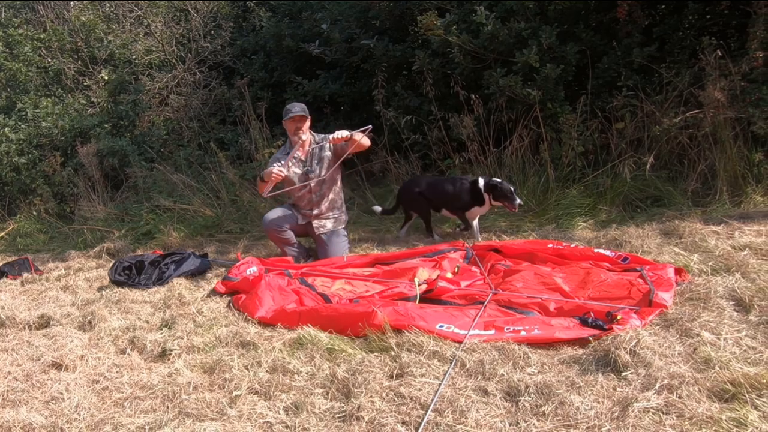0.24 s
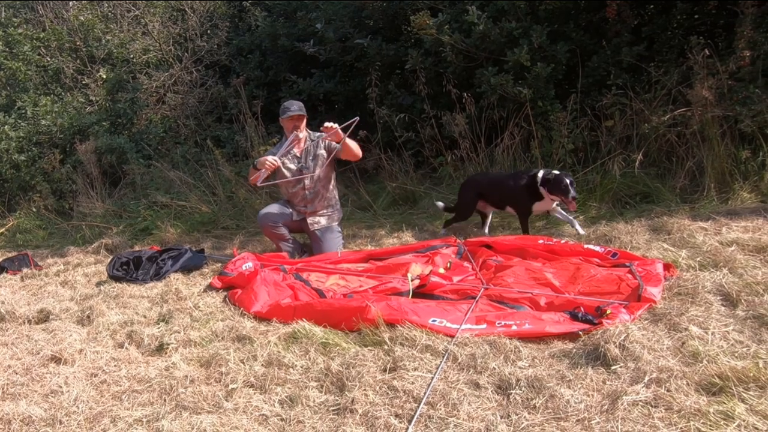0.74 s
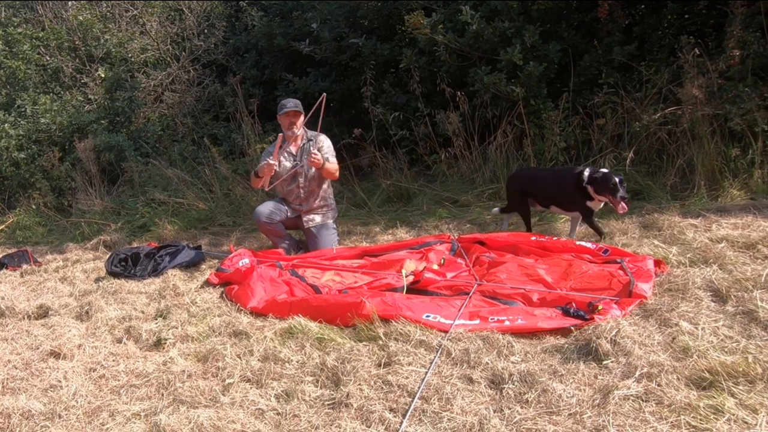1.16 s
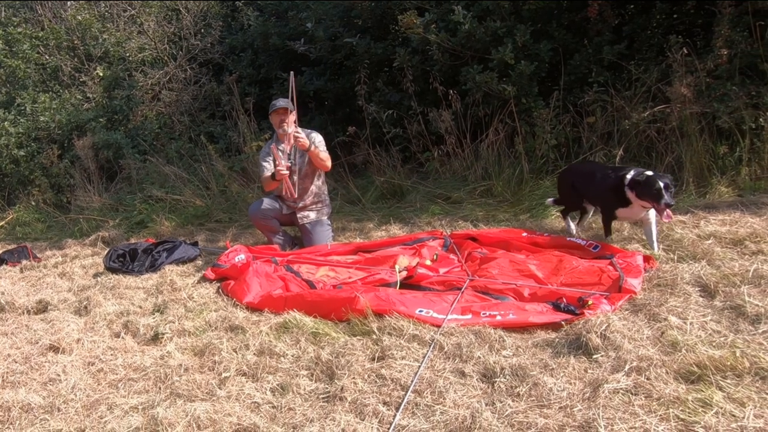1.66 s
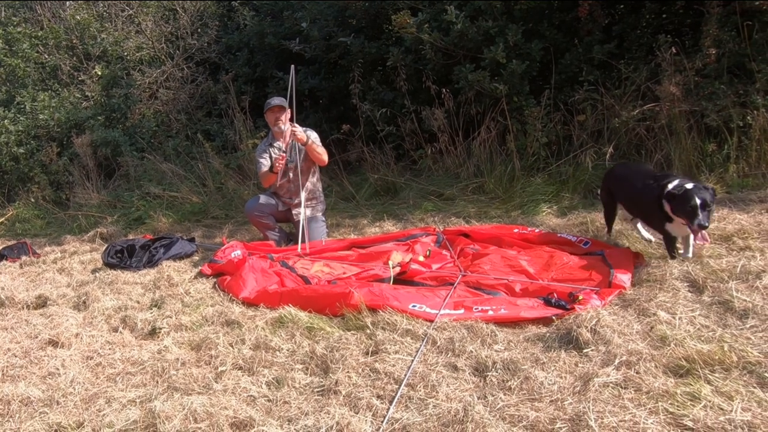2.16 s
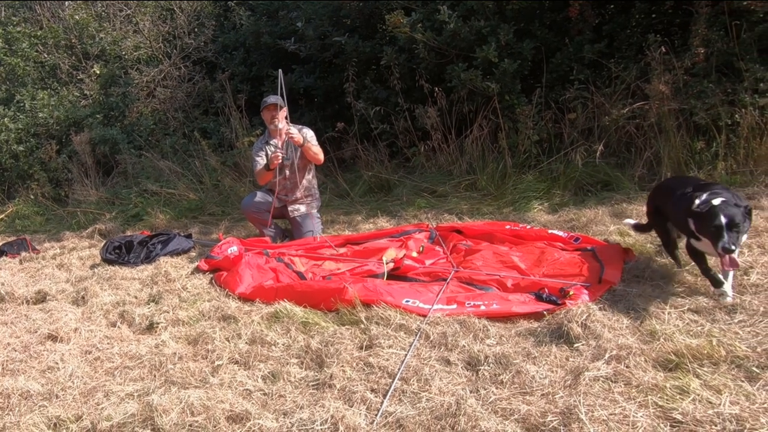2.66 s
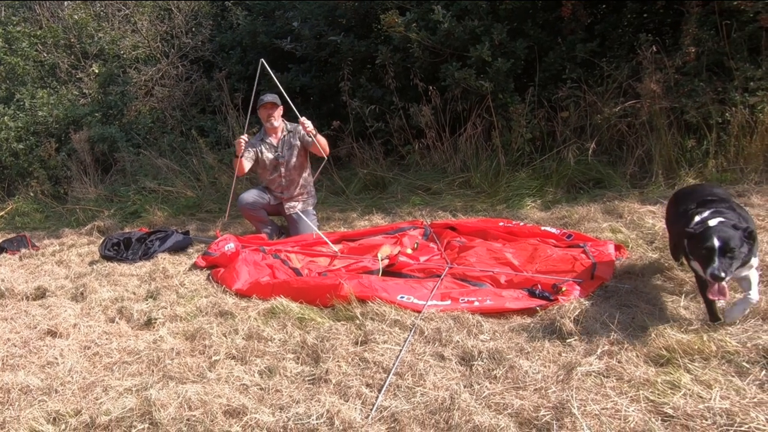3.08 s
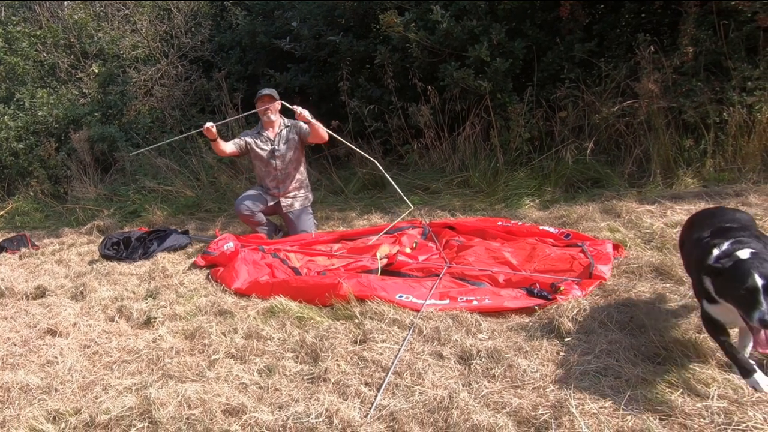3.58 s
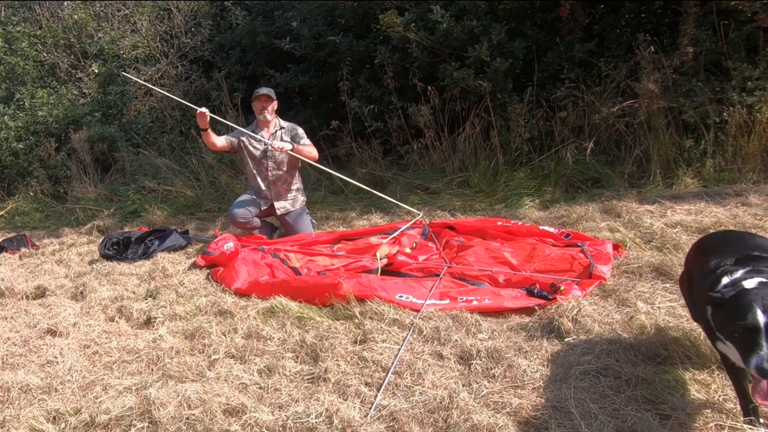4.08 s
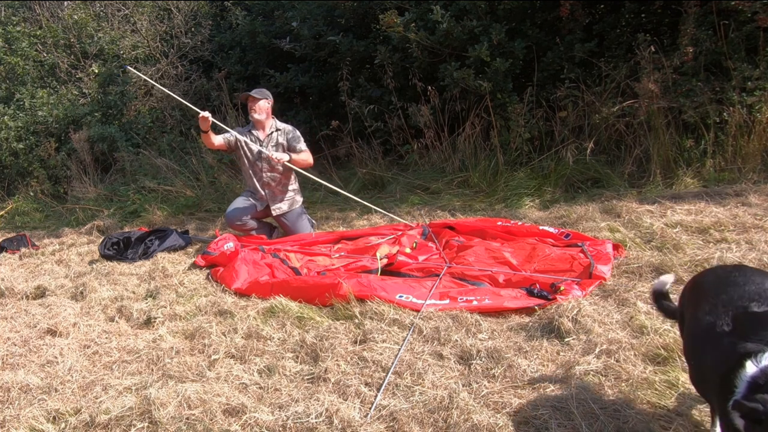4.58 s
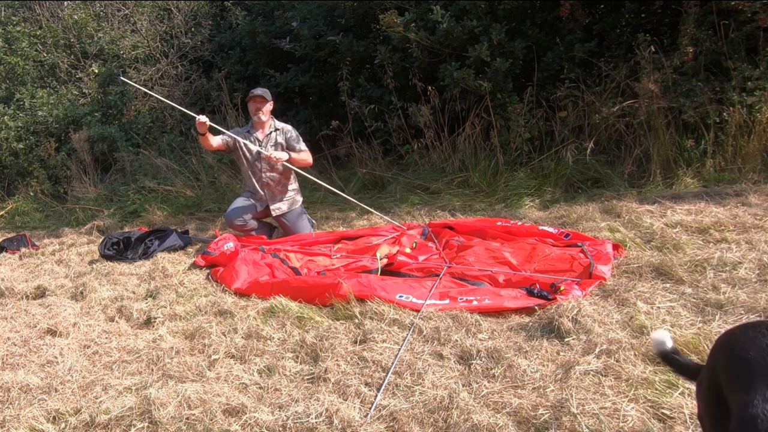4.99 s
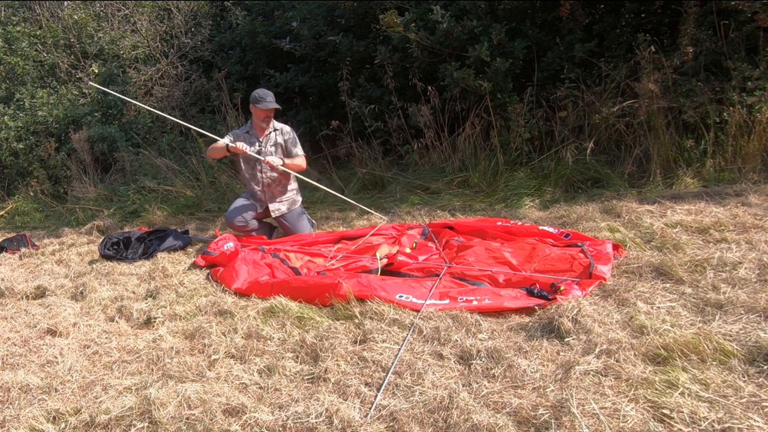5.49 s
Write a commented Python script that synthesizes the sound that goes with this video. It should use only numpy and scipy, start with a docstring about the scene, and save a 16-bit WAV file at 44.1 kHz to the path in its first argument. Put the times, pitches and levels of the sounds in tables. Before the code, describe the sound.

Light metal tubes click, clatter and scrape as a tent pole is unfolded and locked together, close and dry, in a quiet field.

```python
"""An aluminium tent pole clacks, rattles and snaps into its joints as a kneeling man unfolds it in a field.
The elastic cord pulls the sections together: each contact is a burst of many short-lived tones.
Bumps in the grip are hollow knocks; tubes sliding along each other are noise in narrow singing bands.
Some snaps jolt the close microphone. A hedge scatters the pole's sound faintly.
Behind it, shaped noise makes a distant outdoor murmur and a low drone."""
import sys
import numpy as np
from scipy import signal
from scipy.fft import rfft, irfft
from scipy.io import wavfile
from scipy.ndimage import uniform_filter1d

SR = 44100
rng = np.random.default_rng(int(sys.argv[2]) if len(sys.argv) > 2 else 0)


def wrap_up_sound(samples):
    """Save the sound to the file named by the first command line argument, as 16-bit audio."""
    columns = np.atleast_2d(samples).T
    # keep every value between -1 and 1, then stretch to whole-number steps
    tamed = np.clip(columns, -1, 1)
    steps = np.round(tamed * 32767).astype(np.int16)
    wavfile.write(sys.argv[1], SR, steps)


N = 252693

# Tube meets tube: t/s, relative level of the ring/dB, clack against ring/dB, bright edge against ring/dB,
# clack note f/Hz, ring note f/Hz
CONTACTS = [(0.146, -50, 5.5, -11, 3110, 5740), (0.2686, -13.5, -3, -7, 3900, 7400),
            (0.3859, -48, 2.5, -22, 2800, 7140), (0.4274, -16.5, -1.5, -14.5, 3410, 7740),
            (0.6073, -37, -0.5, -14.5, 3320, 6200), (0.6477, -11.5, 0, -5, 3450, 8300),
            (0.723, -40.5, -7, -23, 4410, 6550), (0.7475, -51.5, -5, -21, 4350, 6230),
            (1.1132, -50, 0, -12, 2970, 7810), (1.197, -39.5, -7, -4, 2840, 6250),
            (1.268, -30, -4, -15, 2510, 6700), (1.4249, -23.5, -5.5, -21, 2500, 6820),
            (1.4623, -25.5, -17, -23, 4570, 7040), (1.9134, -26, -2, -14, 4470, 6580),
            (1.9363, -15.5, -10.5, -17, 4490, 6440), (1.946, -21, -4, -24, 4500, 7400),
            (1.9574, -21, -6, -18, 4490, 7700), (2.1443, -45, 1, -16, 4170, 6850),
            (2.2448, -13.5, -3.5, -2.5, 4530, 7370), (2.264, -32.5, 10.5, -2.5, 2750, 6740),
            (2.2905, -27.5, -0.5, -3, 2980, 9000), (2.2956, -20, 1, -7, 2970, 9130),
            (2.3576, -15, 2, -11, 2950, 6490), (2.4743, -12.5, -3, -12, 3210, 6780),
            (2.4856, -24, 1.5, -12, 2260, 5800), (2.5292, -37.5, 5, -17, 2910, 6700),
            (2.6438, -15.5, -2, -10, 4730, 7740), (2.6954, -11.5, -2, -6, 4340, 8400),
            (2.725, -31.5, -2, -8, 2450, 6290), (2.7586, -35, 5.5, -4, 2840, 9700),
            (2.7825, -13.5, -7.5, -10.5, 2280, 8700), (2.7963, -33, 3.5, -1, 3840, 5280),
            (2.8057, -21.5, -4.5, -8.5, 3590, 5200), (2.8254, -27.5, 1.5, -11, 2510, 5140),
            (2.8605, -42, 1.5, -13, 2140, 6850), (3.0433, -13.5, -2, -7, 4690, 6360),
            (3.0495, -16, -15.5, 1.5, 4460, 8350), (3.4336, -49, -6, -10, 1600, 8100),
            (3.7335, -39, 3, -5.5, 2900, 5030), (3.998, -41.5, 3, -7, 3960, 5100),
            (4.074, -13.5, -2.5, -8.5, 1640, 5190), (4.0762, -21, 6, -7.5, 2170, 6100),
            (4.224, -39, 3.5, -14, 2010, 6580), (4.2561, -22, -3.5, -12, 4650, 8160),
            (4.7597, -27, 4.5, -15, 4330, 7720), (5.1133, -32, 2, -10, 2720, 8360)]
# Groups of tones in one section, from hollow body to bright edge: centre f/Hz, spread/octaves, level/dB,
# decay time as a multiple of the ring's, build-up/s
TONE_FAMILIES = [(488, 1.096, -3, 1.77, 0.0011), (1517, .45, -5.5, 1.2, 0.0003),
                 (3155, 0.56, -2.5, 0.97, 0.00031), (7256, 0.46, 0, 0.69, 0.00047),
                 (11860, 0.36, 0.5, 0.66, 0.00032)]
# Resonances of the tubes: f/Hz, width before damping/Hz, level/dB
TUBE_RESONANCES = [(2910, 150, -12), (3200, 57, -15), (4226, 510, -5.5), (4680, 400, -3.5), (5150, 680, -1),
                   (6200, 99, -1), (6920, 150, -8), (7740, 290, 0), (8480, 170, -0.5), (9260, 351.5, -4),
                   (9970, 260, -8.5), (10600, 140, -4)]
# Dull knocks of the bundle in the hands: t/s, level of the hollow part/dB, centre f/Hz
KNOCKS = [(2.217, -23.5, 547), (2.237, -24, 515), (2.246, -19, 420.4), (2.273, -36, 530),
          (2.292, -30.5, 532), (2.341, -27.5, 487), (2.359, -22, 530), (2.487, -32.5, 484),
          (2.535, -28.5, 485), (2.65, -31.5, 528), (2.71, -30, 480), (2.727, -35, 490), (2.787, -31.5, 526),
          (2.81, -34, 487), (3.044, -28.5, 421), (3.667, -33, 616), (3.739, -40.5, 603),
          (3.909, -47.5, 422), (4.084, -30.5, 761)]
# Tube slides along tube: t at full pressure/s, relative treble level/dB, shaft noise against that/dB,
# rise/s, hold/s, release/s
SLIDES = [(.416, -36.5, -6, 0.012, 0.00535, .025), (0.608, -41, -3.5, 0.01, 0.0034, 0.017),
          (0.676, -47.5, 2, .02, .006, .035), (1.209, -43, -0.5, 0.043, 0.0048, 0.029),
          (1.24, -49.5, 3.5, 0.022, .02, 0.048), (1.463, -33.5, -1.5, 0.043, .025, 0.085),
          (1.623, -23, -9.5, 0.038, 0.093, .036), (1.789, -48, 2, 0.024, 0.046, 0.032),
          (1.872, -49, -4, 0.013, 0.0032, 0.079), (1.92, -29.5, -3.5, 0.0097, 0.048, .033),
          (2.235, -40, 8.5, .012, .04, 0.058), (2.35, -55.5, 23, 0.082, .015, 0.033),
          (2.419, -51.5, 6.5, 0.029, 0.0019, 0.03), (2.532, -44.5, 9.5, 0.062, .005, 0.042),
          (2.597, -46, 3.5, .02, 0.0026, 0.03), (2.699, -32, 7.5, 0.0088, 0.00513, 0.048),
          (2.804, -39.5, 4, 0.015, 0.025, 0.037), (2.919, -55.5, 7.5, 0.2, 0.0025, 0.064),
          (3.58, -57, 8.5, 0.13, .04, .05), (3.665, -43.5, 7.5, 0.082, .003, 0.056),
          (3.737, -49.5, 10, .03, 0.0045, .11), (3.99, -52, 8.5, 0.062, .04, 0.11),
          (4.883, -66, 13.5, .1, .005, .09), (5.015, -46.5, 3, 0.026, 0.023, .03)]
# Colour of the plain rubbing noise: f/Hz, relative level/dB
RUB_COLOUR = [(1000, -24), (2500, -5.5), (4000, -12.5), (5200, -4.5), (6400, 10), (7700, 8), (9500, -9),
              (11000, -12), (12500, -14), (16000, -20)]
# Colour of the hollow shaft noise: f/Hz, relative level/dB
SHAFT_COLOUR = [(30, 5), (70, 9.5), (130, 5), (300, -7), (600, -2), (1100, 2), (1800, -11), (2800, -7.5),
                (4500, -14.5), (9000, -51.5)]
# Snaps that jolt the microphone: t/s, level of the push/dB, length of the push/s
JOLTS = [(0.2693, -29, 0.0045), (0.648, -20, 0.0073), (3.0433, -10, .0125), (4.076, -25.5, 0.0074)]
# Colour of the early reflections from ground and body: f/Hz, relative level/dB
NEAR_COLOUR = [(100, 1.5), (900, 5.5), (3000, -12), (8000, -14.5), (15000, -8.5)]
# Colour of the hedge's dull tail: f/Hz, relative level/dB
HEDGE_COLOUR = [(100, 20), (900, 2.5), (3000, -18), (8000, -26), (15000, -19)]
# Colour of the outdoor murmur: f/Hz, relative level/dB
MURMUR_COLOUR = [(20, -3), (45, -4), (70, -1), (100, -8.5), (130, -3.5), (180, -10), (300, -14),
                 (550, -13.5), (800, -6), (1050, -8), (1600, -18), (2900, -28), (6000, -31), (12000, -34.5),
                 (16000, -38)]
# Middle level of the murmur, which then wavers: t/s, level/dB
MURMUR_LEVEL = [(0, -52.5), (1.3, -49), (3.15, -50.5), (3.9, -49), (5.7, -49)]
# Low drone in the distance: f/Hz, width of each of two filter passes/Hz, level before wavering/dB
DRONE = [(64.6, 7.9, -54.5), (136.4, 7.8, -59)]
# How much the channels differ in the pole's sound: f/Hz, relative level/dB
PHASE_SHIFT_COLOUR = [(50, -5), (500, -6.5), (3000, -8.5), (8000, 1.5), (14000, 7)]
# Colour of the faint noise that differs between the channels: f/Hz, relative level/dB
WIDE_NOISE_COLOUR = [(30, -1), (130, -4), (500, -9), (1000, -21.5), (2500, -14.5), (7000, -13.5),
                     (15500, -17)]

WIDE_NOISE_DB = -71
TOP_HZ = 15900
TIME = np.arange(N) / SR
AGE = TIME[:int(.2 * SR)]  # seconds since a short sound began

# Time for the ring to fall 60 dB after a usual blow; each dB of extra force lengthens it very slightly
RING_T60_S, USUAL_BLOW_DB, RING_GROWTH_PER_DB = 0.026, -22, 0.0008
# The hollow body follows the clack's level; soft touches sound hollower than hard snaps
BODY_DB, BODY_FOLLOW, BODY_PER_DB = -9.5, .85, 0.2965
KNOCK_T60_S = .06
# Pressure drop over one rise or release time, and slow sag while the pressure is held
STROKE_RANGE_DB, SAG_DB_PER_S = 31, 55
STROKE_ROUNDING = 1.35  # above 1 a stroke lingers near its full pressure
SHAFT_FOLLOW = 0.71  # shaft noise follows the pressure less steeply than the treble
# The shiver after each clack: level against the clack, shaft noise against that, decay time
SHIVER_DB, SHIVER_SHAFT_DB, SHIVER_T60_S = -22.5, 4.5, .11


def undb(db):
    """Turn decibels into a multiplier."""
    return 10 ** (np.asarray(db) / 20)


def unit(x):
    """Scale a sound to an rms (average strength) of 1."""
    return x / np.sqrt(np.mean(x ** 2))


def add(track, s, sound):
    """Mix a sound into the track at time s."""
    i = int(s * SR)
    track[i:i + len(sound)] += sound[:N - i]


def colour(x, points):
    """Make each pitch range louder or softer, following (f/Hz, level/dB) points."""
    hz, db = np.transpose(points)
    bins = np.maximum(np.fft.rfftfreq(len(x), 1 / SR), 1)
    gain = undb(np.interp(np.log(bins), np.log(hz), db))
    return irfft(rfft(x) * gain, len(x))


def resonate(x, hz, width_hz):
    """Let one resonance answer the sound, with gain 1 at its centre."""
    return signal.lfilter(*signal.iirpeak(hz, hz / width_hz, SR), x)


def fade(t60):
    """Die away evenly in dB, by 60 dB in t60 seconds."""
    return np.exp(-np.log(1000) * AGE / t60)


def walk(rate):
    """Wander at random between new values, rate of them per second."""
    knots = rng.standard_normal(size=4096)
    return np.interp(TIME * rate, np.arange(len(knots)), knots)


def modes(centre_hz, octaves, t60, rise_s, count=64):
    """A struck body vibrates in many fading tones at once; each blow stirs them differently."""
    place, phase = rng.random((2, count, 1))
    # one tone at a random place in each of count equal steps, from -2 to 2 spreads
    offset = 4 * (np.arange(count)[:, None] + place) / count - 2
    hz = centre_hz * 2 ** (octaves * offset)
    # strongest at the centre; nothing above the highest pitch the file can hold
    size = np.exp(-offset ** 2 / 2) * np.cos(np.pi * offset / 4) ** .5 * (hz < SR / 2)
    ringing = AGE[AGE < .01 + 1.2 * t60]
    waves = np.sin((2 * np.pi * (hz * ringing + phase)).astype(np.float32))
    ring = (size * waves).sum(0)
    ring = np.pad(ring, (0, len(AGE) - len(ring)))
    ring = ring * fade(t60) * (1 - np.exp(-AGE / rise_s))
    head = ring[:int(.007 * SR)]
    return ring / np.sqrt(np.mean(head ** 2))  # rms 1 over the first 7 ms


def tube(x, damping=0.95):
    """The tubes' resonances answer a push; less damping narrows them."""
    return sum(undb(db) * resonate(x, hz, width * damping) for hz, width, db in TUBE_RESONANCES)


def clacks(tube_db=-7, direct_db=-3, note_db=-7, note_hold=1.1, thud_db=-17, thud_hz=100,
           thud_t60=0.08, chatter_db=-18, chatter_s=0.005):
    """Contacts stir families of tones and two clear notes, repeat once softly, and thud in the hands."""
    metal, hands = np.zeros(N), np.zeros(N)
    for s, db, clack_db, edge_db, clack_hz, ring_hz in CONTACTS:
        force_db = db - USUAL_BLOW_DB
        t60 = RING_T60_S * np.exp(RING_GROWTH_PER_DB * force_db)
        body_db = BODY_DB + BODY_FOLLOW * clack_db - BODY_PER_DB * force_db
        shares_db = (body_db, (body_db + clack_db) / 2, clack_db, 0, edge_db)
        ring = np.zeros(len(AGE))
        for (hz, octaves, family_db, hold, rise_s), share_db in zip(TONE_FAMILIES, shares_db):
            ring += undb(db + share_db + family_db) * modes(hz, octaves, t60 * hold, rise_s)
        clack_note = undb(clack_db) * np.sin(2 * np.pi * clack_hz * AGE)
        ring_note = np.sin(2 * np.pi * ring_hz * AGE)
        note_shape = fade(t60 * note_hold) * (1 - np.exp(-AGE / 0.00016))
        ring += 2 * undb(db + note_db) * (clack_note + ring_note) * note_shape
        add(metal, s, ring)
        chatter_delay = chatter_s * (.5 + rng.random())
        add(metal, s + chatter_delay, undb(chatter_db) * ring)
        thud = modes(thud_hz, 1.172, thud_t60, 0.00089, count=24)
        add(hands, s, undb(db + thud_db) * thud)
    return undb(direct_db) * metal + undb(tube_db) * tube(metal) + hands


def knocks(hollow_octaves=.8, overtone_db=-6, overtone_hz=2000, rise_s=0.00094):
    """Sections bump inside the grip: a hollow group of tones with a softer, higher group above it."""
    out = np.zeros(N)
    for s, db, hz in KNOCKS:
        hollow = modes(hz, hollow_octaves, KNOCK_T60_S, rise_s)
        overtones = modes(overtone_hz, 0.36, KNOCK_T60_S * 0.92, rise_s)
        add(out, s, undb(db) * (hollow + undb(overtone_db) * overtones))
    return out


def friction():
    """Rubbing strength over time: strokes rise, sag and release; after each clack the tubes shiver together."""
    treble_power, shaft_power = np.zeros(N), np.zeros(N)
    for s, db, shaft_db, rise_s, hold_s, release_s in SLIDES:
        since = TIME - s
        before = np.maximum(-since, 0) / rise_s
        after = np.maximum(since - hold_s, 0) / release_s
        off = before + after  # 0 while the pressure is held
        near = off < 2
        sag_db = SAG_DB_PER_S * np.clip(since[near], 0, hold_s)
        pressure_db = -STROKE_RANGE_DB * off[near] ** STROKE_ROUNDING - sag_db
        treble_power[near] += undb(db + pressure_db) ** 2
        shaft_power[near] += undb(db + shaft_db + SHAFT_FOLLOW * pressure_db) ** 2
    for s, db, *_ in CONTACTS:
        shiver = undb(db + SHIVER_DB) * fade(SHIVER_T60_S)
        add(treble_power, s, shiver ** 2)
        add(shaft_power, s, (undb(SHIVER_SHAFT_DB) * shiver) ** 2)
    return np.sqrt(treble_power), np.sqrt(shaft_power)


def slides(grain_db=6, ring_db=-4.5, rub_db=-6, judder_db=1.65, catch_db=2.5):
    """Dense tiny slips make the loosely held tubes sing in narrow bands; the pressure judders and catches."""
    treble, shaft = friction()
    grain = grain_db * rng.standard_normal(N)
    unevenness_db = grain + judder_db * walk(170) + catch_db * walk(60)
    slips = rng.standard_normal(N) * undb(unevenness_db)
    singing = unit(tube(slips, damping=.4))
    rubbing = unit(colour(slips, RUB_COLOUR))
    scrape = undb(ring_db) * singing + undb(rub_db) * rubbing
    shaft_noise = unit(colour(slips, SHAFT_COLOUR))
    # smooth both strengths over 200 samples
    return uniform_filter1d(treble, size=200) * scrape + uniform_filter1d(shaft, size=200) * shaft_noise


def jolt(swing_ratio=9, settle_ratio=2.2):
    """A snap jolts the microphone: a short push, then a slower, damped swing back of equal area."""
    out = np.zeros(N)
    for s, db, push_s in JOLTS:
        push = np.sin(np.pi * np.minimum(AGE / push_s, 1))
        swing = np.sin(2 * np.pi * AGE / (swing_ratio * push_s))
        rebound = swing * np.exp(-AGE / (settle_ratio * push_s))
        add(out, s, -undb(db) * push)
        add(out, s + push_s, undb(db) * rebound * push.sum() / rebound.sum())
    return out


def scatter(x, near_db=-14, near_t60=0.049, far_db=-27, far_t60=.3):
    """Ground and body send back short reflections; the hedge returns a faint, dull tail."""
    onset = 1 - np.exp(-(AGE / 0.0085) ** 2)
    response = np.zeros(len(AGE))
    for points, db, t60 in ((NEAR_COLOUR, near_db, near_t60), (HEDGE_COLOUR, far_db, far_t60)):
        noise = colour(rng.standard_normal(len(AGE)), points)
        shape = fade(t60) * onset
        response += undb(db) * noise * shape / np.linalg.norm(shape)
    return signal.fftconvolve(x, response)[:N]


def field(waver_db=-1.56, drone_waver_db=2):
    """Distant outdoor sounds blur into a wavering murmur, with a drone in two low bands under it."""
    murmur = unit(colour(rng.standard_normal(N), MURMUR_COLOUR))
    level_db = np.interp(TIME, *np.transpose(MURMUR_LEVEL)) + waver_db * walk(8.7)
    drone = np.zeros(N)
    for hz, width, db in DRONE:
        once = resonate(rng.standard_normal(N), hz, width)
        drone += undb(db) * unit(resonate(once, hz, width))
    return murmur * undb(level_db) + drone * undb(drone_waver_db * walk(5.8))


def scene(side_db=-31):
    """Nearly mono: the channels differ by a slight phase shift, most in the treble, and a faint noise."""
    pole = clacks() + knocks() + slides()
    mid = pole + scatter(pole) + jolt() + field()
    quarter_turn = np.imag(signal.hilbert(pole))  # every tone shifted by a quarter cycle
    shifted = colour(quarter_turn, PHASE_SHIFT_COLOUR)
    wide_noise = unit(colour(rng.standard_normal(N), WIDE_NOISE_COLOUR))
    side = undb(side_db) * shifted + undb(WIDE_NOISE_DB) * wide_noise
    return np.array([mid + side, mid - side])


def record(dry):
    """The recorder rounds the loudest peaks and cuts the top of the treble."""
    ceiling = .74
    rounded = dry / (1 + (dry / ceiling) ** 6) ** (1 / 6)
    top_cut = signal.cheby1(12, .2, TOP_HZ, fs=SR, output="sos")
    return signal.sosfilt(top_cut, rounded)


dry = scene()
out = record(dry)
wrap_up_sound(out)
```